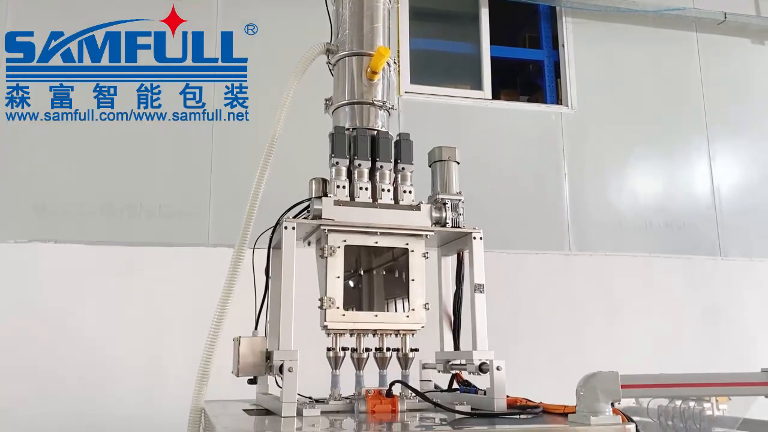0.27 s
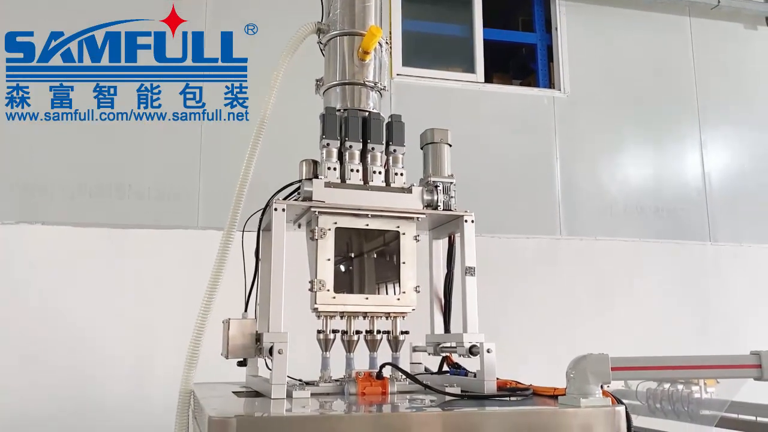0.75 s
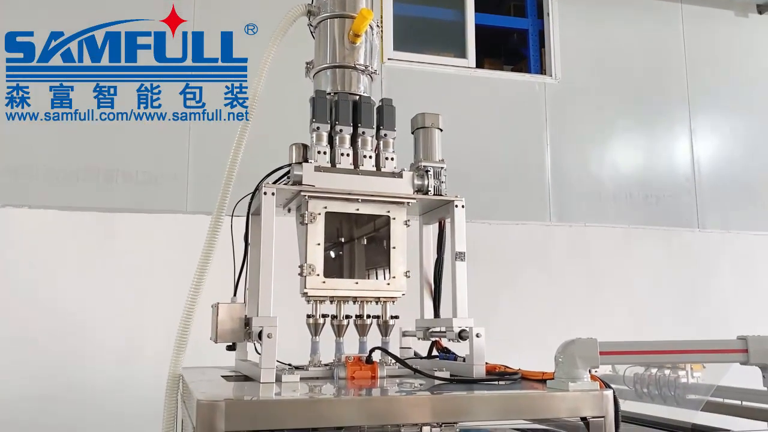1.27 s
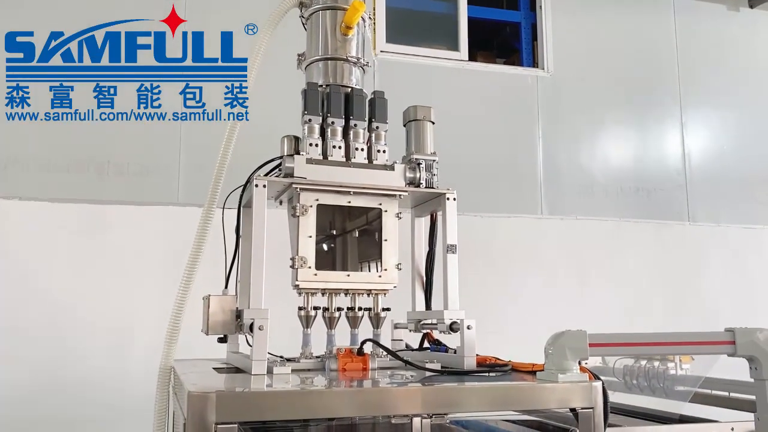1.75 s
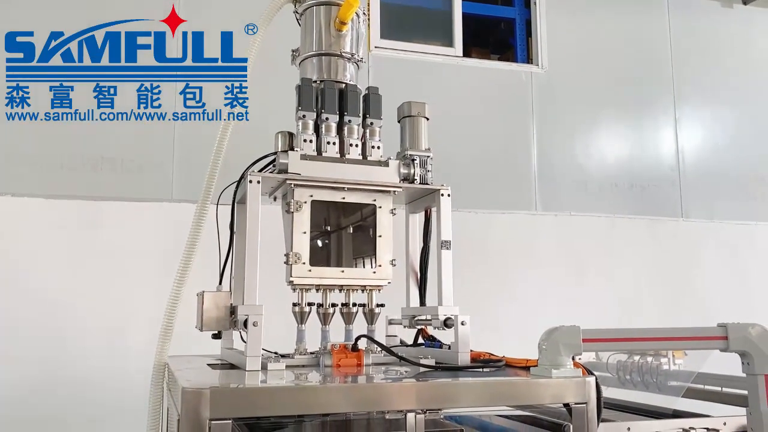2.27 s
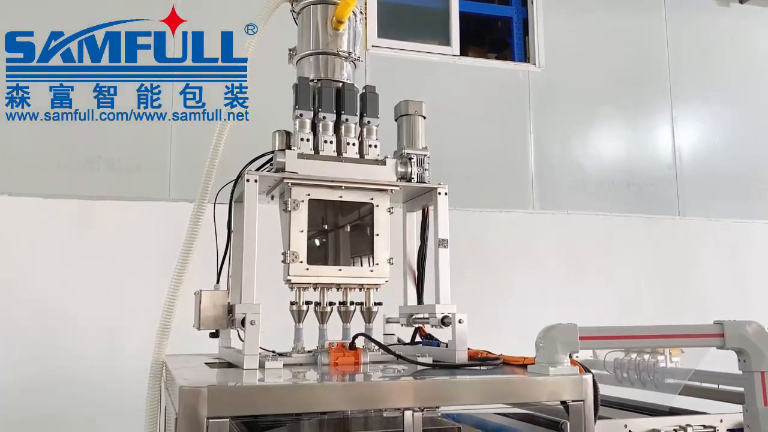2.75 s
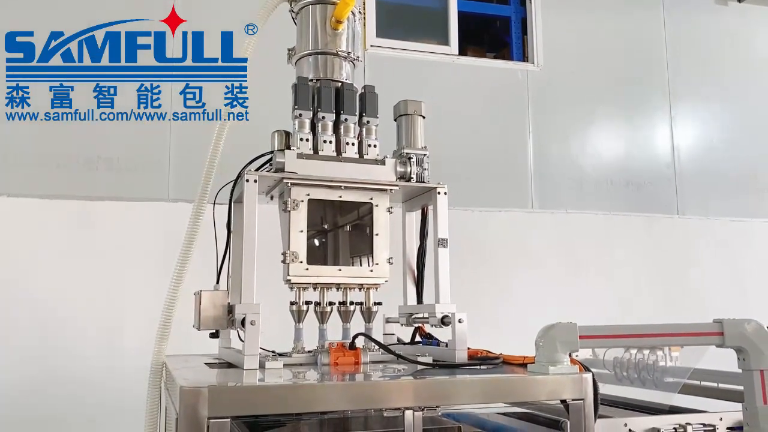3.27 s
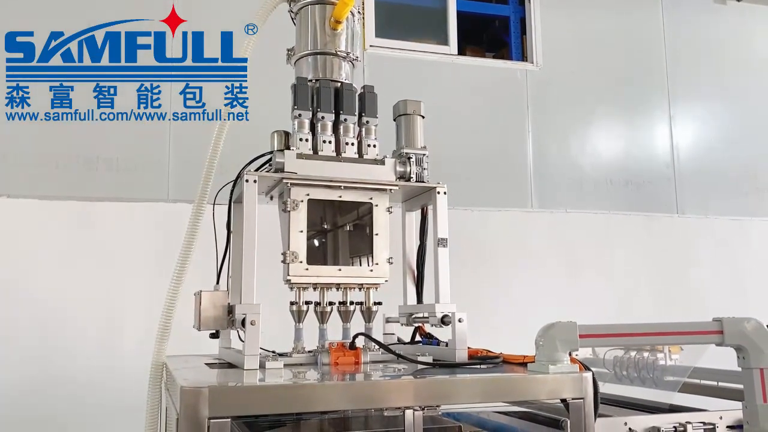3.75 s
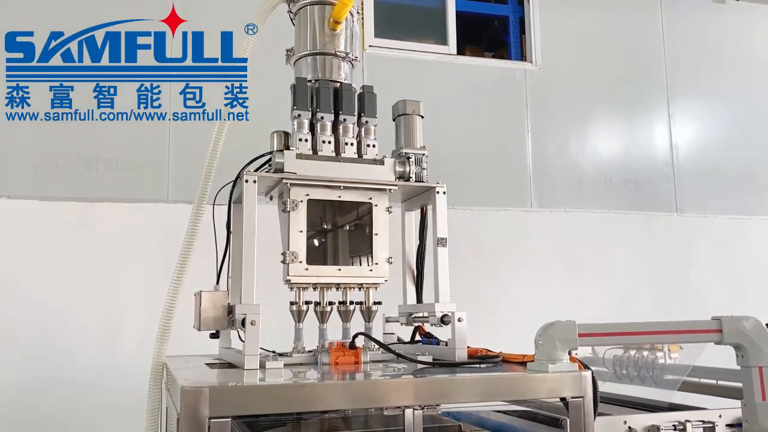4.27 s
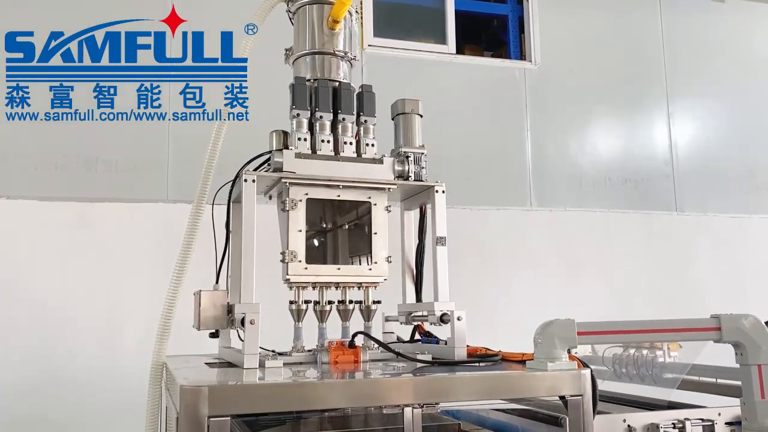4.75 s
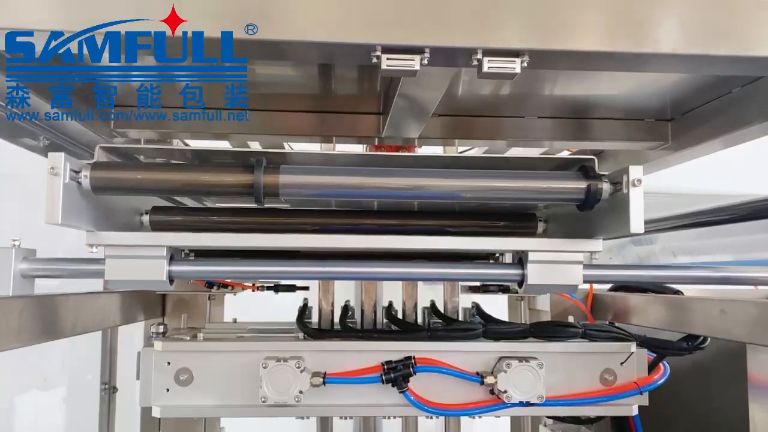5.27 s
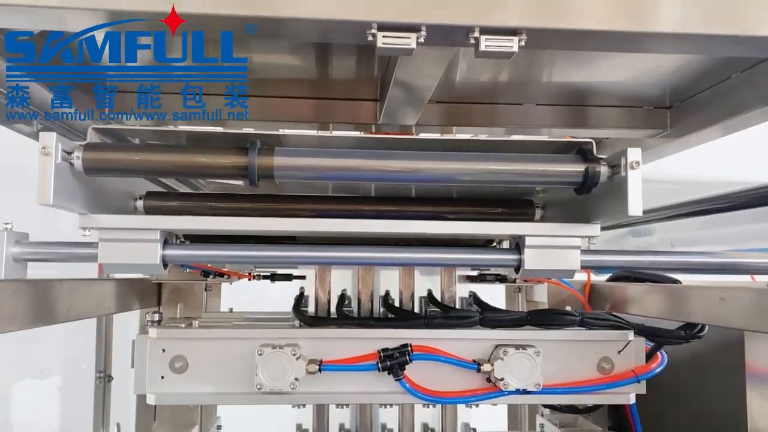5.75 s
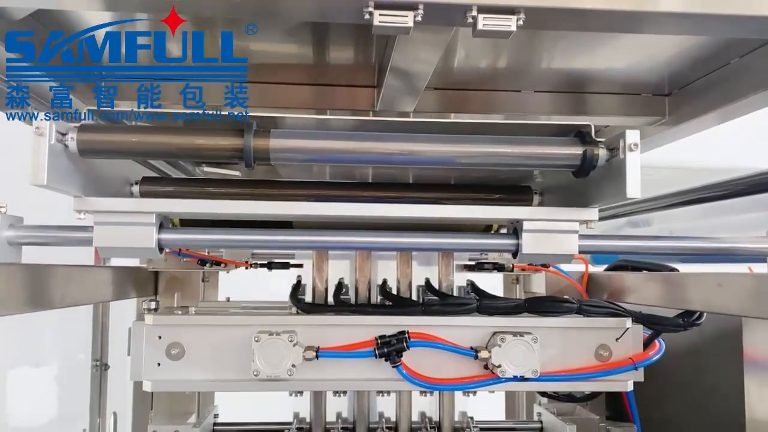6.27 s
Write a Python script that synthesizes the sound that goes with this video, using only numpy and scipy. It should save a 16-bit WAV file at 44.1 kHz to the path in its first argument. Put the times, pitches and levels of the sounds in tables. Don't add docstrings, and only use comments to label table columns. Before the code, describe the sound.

Rattling mechanical strokes swell and slow down over a motor hum, broken by hissing air jets, dull thuds and squeaks, with a tiny dropout before the second view.

```python
import sys
import numpy as np
from scipy import signal
from scipy.fft import rfft, irfft, next_fast_len
from scipy.io import wavfile
from scipy.ndimage import map_coordinates

SR = 44100
rng = np.random.default_rng(int(sys.argv[2]) if len(sys.argv) > 2 else 0)


def unload_audio(sound):
    columns = np.transpose(np.atleast_2d(sound))
    steps = np.round(np.clip(columns, -1, 1) * 32767)
    wavfile.write(sys.argv[1], SR, steps.astype(np.int16))


def ratio(d):
    e = np.asarray(d, float) / 20
    return 10 ** e


N = 287532
T = np.arange(N) / SR

# start t/s, end t/s
GAP = (4.9306, 4.9585)


def unit(x):
    return x / np.sqrt(np.mean(x ** 2) + 1e-20)


def along(points, hz):
    f, v = np.transpose(points)
    return ratio(np.interp(np.log(hz + 1), np.log(f + 1), v))


def curves(rows):
    s, *cols = np.transpose(rows)
    return [np.interp(T, s, c) for c in cols]


def wobble(rate):
    return map_coordinates(rng.standard_normal(int(N * rate / SR) + 4), [T * rate])


def filtered(x, response):
    m = next_fast_len(N + SR // 4)
    return irfft(rfft(x, m) * response(np.fft.rfftfreq(m, 1 / SR)), m)[..., :N]


def ringing(modes):
    def response(f):
        total = 0
        for k, (centre, width, db) in enumerate(modes):
            damping = 1j * f * width
            total = total + (-1) ** k * ratio(db) * damping / (centre * centre - f * f + damping)
        return total
    return response


def noise():
    return rng.standard_normal((2, N))


def rough_tone(hz, drift, flutter_db, rate):
    turn = 2 * np.pi * np.cumsum(hz + 0 * T) / SR
    paths = []
    for _ in range(2):
        level = np.sqrt(2) * ratio(flutter_db * wobble(rate))
        paths.append(level * np.sin(turn + drift * wobble(rate) + rng.uniform(0, 2 * np.pi)))
    return np.array(paths)


def bursts(rows, rise, fall, swell=0):
    power = 0
    for start, end, db in rows:
        attack = np.clip((T - start) / rise, 0, 1)
        level = db + swell * (T - start) - fall * np.maximum(T - end, 0)
        power = power + (attack * ratio(level)) ** 2
    return np.sqrt(power)


def stroke():
    # start t/s, braking t/s, frame level/dB, screw level/dB, shaft tone level/dB
    strokes = [
        (0, 0.457, 0.5, -1.5, -1),
        (3.147, 3.863, 1, -1.5, 0.5),
        (4.94, 4.991, 2, -6, 4.5),
    ]
    rows = np.array(strokes)
    running = np.clip(np.searchsorted(rows[:, 0], T) - 1, 0, None)
    _, braking, *db = rows[running].T
    return T - braking, *db


def shape(since, axis):
    # t/s from braking, speed/turns per s, effort level/dB, shaft tone level/dB
    course = [
        (-.72, 36, -35, -47),
        (-.52, 40.5, -8, -33),
        (-.33, 45.7, -1.5, -31),
        (-0.058, 46.2, 0.5, -24.5),
        (.07, 44.8, -3, -20.5),
        (.3, 37.5, -8.5, -36),
        (.53, 35, -11, -37),
        (.83, 32, -18.5, -46),
        (1.2, 30, -26.5, -67),
    ]
    return np.interp(since, *np.transpose(course)[[0, axis]])


def follow(full_db, run_up, coast, hold_s):
    since = stroke()[0]
    held = np.where(since < 0, since, np.maximum(since - hold_s, 0))
    effort = shape(held, axis=2) - shape(0, axis=2)
    return full_db + np.where(since < 0, run_up, coast) * effort


def hall():
    # f/Hz, density level/dB per Hz
    floor_colour = [(20, -60), (35, -25), (50, -6), (100, 0), (300, -11), (500, -13.5), (700, -20),
                    (1000, -22), (3000, -28.5), (7000, -43.5), (12000, -41.5), (16000, -77)]
    return ratio(-30.5) * unit(filtered(noise(), lambda f: along(floor_colour, f)))


def electrics():
    # t/s, f/Hz, level/dB
    inverter = [(0, 5870, -62), (.7, 5865, -54), (1.0, 5872, -49.5), (1.8, 5860, -50), (2.25, 5902, -47),
                (2.4, 5890, -55), (4.2, 5885, -57), (4.5, 5930, -53), (4.93, 5970, -54)]
    # t/s, fan level/dB, pump level/dB
    motor_load = [(0, -1.5, -4.5), (2.35, 3, -7), (2.45, -1, -2), (3.1, 3, -6.5), (3.3, 6, -21),
                  (4.94, 4.5, -22), (4.96, -1, -18), (5.9, -3, -11.5), (6.05, 0, 3), (6.52, 1, -2.5)]
    # f/Hz, rms level/dB
    fan_hum = [(248, -44.5), (495.5, -44.5), (991, -54)]
    # f/Hz, rms level/dB
    pump_hum = [(118.4, -34), (300.5, -39)]
    hz, db = curves(inverter)
    fan_db, pump_db = curves(motor_load)
    whine = rough_tone(hz, drift=.5, flutter_db=3.5, rate=90)
    whine = whine + ratio(-3.5) * rough_tone(2 * hz, drift=1.1, flutter_db=4.5, rate=93)
    fan = sum(ratio(level) * rough_tone(f, drift=0.81, flutter_db=0.7, rate=14) for f, level in fan_hum)
    pump = sum(ratio(level) * rough_tone(f, drift=0.62, flutter_db=2.0, rate=9) for f, level in pump_hum)
    return ratio(db) * (T < GAP[1]) * whine + ratio(fan_db) * fan + ratio(pump_db) * pump


def frame():
    # f/Hz, density level/dB per Hz
    rumble_colour = [(22, -37), (38, -7.5), (59, -1), (230, 0), (270, -4.5), (304, -2), (323, -5),
                     (420, -15), (550, -65), (920, -120)]
    # f/Hz, width/Hz, level/dB
    steelwork = [(47.6, 5.7, 3), (70, 2.4, 0), (86, 7.6, 2.5), (153.3, 8.5, -6), (225, 14.4, -2),
                 (275, 11.4, -13)]
    # f/Hz, density level/dB per Hz
    clatter_colour = [(230, -6), (330, 1.5), (600, -5), (1000, -9.5), (2000, -16), (2600, -23.5),
                      (3600, -25), (5000, -55)]
    # f/Hz, width/Hz, level/dB
    cover_modes = [(413, 6.4, 3), (579, 29, -2), (718, 33, -0.5), (1088, 96, -1.5), (1514, 11, 1),
                   (1740, 16, 3), (2260, 24, 1.5)]
    # t/s, level/dB
    jolt_hits = [(.04, -21.5), (.33, -24), (.6, -23.5), (.83, -21.5), (1.23, -26), (1.95, -30), (2.3, -34),
                 (3.25, -23), (3.46, -35), (4.16, -19), (4.3, -21.5), (4.66, -24.5), (5.3, -17.5),
                 (5.77, -18.5), (5.901, -29)]
    frame_db = stroke()[1]
    shaken = bursts([(s, s, db) for s, db in jolt_hits], rise=0.0084, fall=55)
    unrest = wobble(14)
    panels = lambda f: along(rumble_colour, f) * (1 + 1.56 * abs(ringing(steelwork)(f)))
    covers = lambda f: along(clatter_colour, f) * (1 + 1.4 * abs(ringing(cover_modes)(f)))
    rumble = unit(filtered(ratio(2.0 * unrest + 0.58 * wobble(40)) * noise(), panels))
    clatter = unit(filtered(ratio(1.9 * unrest + 1.15 * wobble(45)) * noise(), covers))
    rumble_db = frame_db + follow(full_db=-22.5, run_up=.5, coast=0.65, hold_s=0.48)
    clatter_db = frame_db + follow(full_db=-29, run_up=0.4, coast=0.9, hold_s=0.31)
    rumble = np.hypot(ratio(rumble_db), shaken) * rumble
    return rumble + ratio(1.5) * np.hypot(ratio(clatter_db), ratio(-9) * shaken) * clatter


def screw():
    # f/Hz, width/Hz, level/dB
    nut = [(6586, 190, -5), (11965, 102, 1)]
    # f/Hz, density level/dB per Hz
    contact_colour = [(3000, -36), (5500, 5.5), (7500, -3), (9000, 9.5), (10500, -4), (13700, 5.5),
                      (16000, -17)]
    # order of the turning speed, level/dB
    shaft_orders = [(1, -12), (2, -1), (5, -2), (9, -26)]
    # f/Hz, level/dB
    beams = [(70, -3), (140.3, -2), (422, -25)]
    since, _, screw_db, shaft_db = stroke()
    speed = shape(since, axis=1)
    tick_db = follow(full_db=-31.5, run_up=2, coast=1.84, hold_s=0.12) + screw_db
    tone_db = shape(since, axis=3) + shaft_db
    turns = np.cumsum(speed) / SR + 0.28
    size = ratio(2.2 * rng.standard_normal((400, 2)))[turns.astype(int)].T
    away = (turns % 1 - .5) / speed
    away_second = ((turns + 0.38) % 1 - .5) / speed
    contact = size[0] * np.exp(-(away / 0.00134) ** 2)
    contact = contact + 0.11 * size[1] * np.exp(-(away_second / 0.0006) ** 2)
    ticks = unit(filtered(contact * noise(), lambda f: along(contact_colour, f)))
    rolling = 0.48 * ratio(1.1 * wobble(50))
    ring = unit(filtered((contact + rolling) * noise(), ringing(nut)))
    tones = sum(ratio(db) * rough_tone(k * speed, drift=0.2, flutter_db=-1.5, rate=7) for k, db in shaft_orders)
    tones += sum(ratio(db) * rough_tone(hz, drift=0.46, flutter_db=7.5, rate=5) for hz, db in beams)
    return ratio(tick_db) * (ratio(0.5) * ring + ratio(-3) * ticks) + ratio(tone_db - 4.5) * tones


def air():
    # f/Hz, density level/dB per Hz
    low_colour = [(1500, 2.5), (2400, -2.5), (3500, 0.5), (5000, 1), (6500, -1), (7500, -3.5), (9000, -50)]
    # f/Hz, density level/dB per Hz
    high_colour = [(5000, -44), (6500, -8.5), (8000, 4.5), (10500, 3.5), (12500, 0), (14500, 3),
                   (15700, -2), (17000, -25)]
    # open t/s, shut t/s, low hiss level/dB, high hiss level/dB
    valves = [
        (1.926, 2.058, -45.5, -48),
        (2.281, 3.1, -41.5, -45),
        (3.2, 3.264, -42, -52),
        (5.066, 5.123, -40, -50),
        (5.363, 6.6, -44.5, -51.5),
        (5.393, 5.588, -63.5, -53),
        (5.73, 5.9, -46.5, -62),
        (6.438, 6.6, -44, -44.5),
    ]
    screw_db = stroke()[2]

    def jets(axis):
        return bursts(np.array(valves)[:, [0, 1, axis]], rise=0.04, fall=88, swell=1)

    flutter = ratio(.4 * wobble(12) + .7 * wobble(35))
    low = unit(filtered(noise(), lambda f: along(low_colour, f)))
    high = unit(filtered(noise(), lambda f: along(high_colour, f)))
    low_db = follow(full_db=-36.5, run_up=0.3, coast=1.13, hold_s=0.0563) + 0.1 * screw_db
    high_db = follow(full_db=-44, run_up=0.2, coast=1.12, hold_s=0) + 0.24 * screw_db
    low = ratio(5.5) * np.hypot(ratio(low_db), jets(axis=2)) * low
    high = ratio(10.0) * np.hypot(ratio(high_db), jets(axis=3)) * high
    return flutter * (low + high)


def squeaks():
    # t/s, length/s, f/Hz, width/Hz, level/dB
    rubs = [
        (0, 0.094, 14300, 500, -35),
        (2.02, 0.078, 1740, 130, -44),
        (2.915, 0.062, 1240, 27, -38),
        (4.957, 0.44, 1790, 690, -34.5),
        (0.275, .07, 14200, 500, -42),
        (3.293, 0.23, 14250, 500, -36),
        (3.325, 0.027, 9280, 82, -27),
        (4.148, 0.26, 1132, 73, -36.5),
    ]
    out = np.zeros((2, N))
    for s, length, hz, width, db in rubs:
        swell = np.sin(np.pi * np.clip((T - s) / length, 0, 1)) ** 0.34
        out += ratio(db) * swell * unit(filtered(noise(), lambda f: ringing([(hz, width, 0)])(f) ** 2))
    return out


def knocks():
    # t/s, thud level/dB, thud f/Hz, clack level/dB, decay t60/s
    strikes = [(0.037, -37, 110, -19.5, 0.17), (0.081, -14, 70, -48, 0.9), (2.051, -30, 151, -31, 0.22),
               (2.292, -9.5, 135, -42, 0.074), (3.105, -8.5, 130, -30.5, 0.18), (.8, -16.5, 202, -42, .3),
               (4.17, -16.5, 205, -40, 0.23), (3.16, -15.5, 70, -39, 0.44), (3.199, -19.5, 149, -45, 0.33),
               (3.245, -28, 200, -21.5, 0.17), (3.443, -21, 149, -23.5, 0.12), (3.47, -13, 70, -52, 0.54),
               (3.74, -31, 140, -17.5, 0.083), (4.32, -15, 154, -41, 0.078), (5.088, -40, 204, -21.5, 0.31),
               (5.301, -23, 220, -26, 0.37), (5.748, -24, 139, -19, 0.1), (5.79, -23, 77.3, -53, 0.36),
               (6.152, -23.5, 149, -27, 0.15), (6.46, -17, 129.5, -45, 0.23)]
    out, t = np.zeros((2, N + SR)), T[:SR // 3]
    clack = filtered(noise(), lambda f: 1 / (1 + (f / 1900) ** 4) / (1 + (300 / (f + 1)) ** 4))
    for s, thud_db, hz, clack_db, t60 in strikes:
        i = round(s * SR)
        fall = ratio(-60 * t / t60) * (1 - np.exp(-t / 0.005))
        thud = np.sin(2 * np.pi * hz * t) + 0.44 * np.sin(2 * np.pi * 0.606 * hz * t)
        fresh_clack = unit(np.roll(clack, -i, axis=1)[:, :len(t)])
        out[:, i:i + len(t)] += fall * (ratio(thud_db) * thud + ratio(clack_db) * fresh_clack)
    return out[:, :N]


def augers():
    # t/s, tooth rate f/Hz, level/dB, load tilt/dB per order
    dosing = [
        (2.28, 539.3, -60, 2),
        (2.3, 545.6, -24, -4),
        (2.36, 539, -35.5, -1.3),
        (2.6, 540.3, -42, 1.1),
        (2.75, 545.6, -38.5, 0.2),
        (3.1, 539, -45, 2.6),
        (3.17, 540, -54, 2.5),
    ]
    # order, level/dB
    teeth = [(1, 0), (2, -3), (3, -6), (4, -6), (5, -12.5), (6, -11.5), (7, -14), (8, -10.5), (9, -11)]
    hz, db, tilt_db = curves(dosing)
    out = 0
    for k, level in teeth:
        for detune in (.986, .996, 1.005, 1.016):
            rate_hz = k * hz * (detune + .006 * wobble(12))
            tone = rough_tone(rate_hz, drift=.6 + 0.4 * k, flutter_db=5, rate=45)
            out = out + ratio(level + tilt_db * min(k, 4)) * tone
    return ratio(db - 9.0) * (T > dosing[0][0]) * (T < dosing[-1][0]) * out


def ports(paths):
    # f/Hz, likeness, right-port phase/rad, left over right level/dB
    port_pair = [(0, .996, 0, .2), (100, .985, 0, .7), (200, .96, -.1, 1.6), (330, .9, -.15, 3),
                 (500, .68, .2, 2.5), (900, .45, 1, 0), (1700, .4, -.4, .8), (2200, .5, 0, 1),
                 (3000, .5, 1.1, -2.5), (4000, .35, .3, -1), (5300, .3, 1.1, -2), (6300, .62, .2, -2),
                 (7000, .8, -.9, .6), (9000, .95, -3.14, 0), (12350, .95, -6.28, 0), (15200, .95, -9.42, 0),
                 (16000, .95, -9.9, 0)]
    f, *cols = np.transpose(port_pair)

    def response(hz, sign):
        alike, phase, pan_db = [np.interp(hz, f, c) for c in cols]
        u = np.arccos(np.clip(alike, -1, 1)) / 2
        return ratio(sign * pan_db / 2) * np.exp(-.5j * sign * phase) * [np.cos(u), sign * np.sin(u)]

    return np.array([filtered(paths, lambda hz: response(hz, sign)).sum(axis=0) for sign in (1, -1)])


def scene():
    # f/Hz, level/dB
    close_colour = [(30, 3), (90, -8.5), (140, -1.5), (230, 0), (420, -2), (560, 2), (1000, -3),
                    (1900, -3.5), (3000, 0)]
    machine = frame() + screw()
    machine = np.where(T < GAP[0], machine, filtered(machine, lambda f: along(close_colour, f)))
    return ports(machine + air() + electrics() + augers() + knocks() + squeaks() + hall())


def joint_stereo(x):
    window, lead = signal.windows.kaiser_bessel_derived(2048, 4 * np.pi), 773
    mid_side = np.pad([x[0] + x[1], x[0] - x[1]], ((0, 0), (lead, 0)))
    z = signal.stft(mid_side, window=window, nperseg=2048)[2]
    bands = z[:, :1024].reshape(2, 32, 32, -1)
    level = 10 * np.log10(np.mean(abs(bands) ** 2, axis=2) + 1e-20)
    busy = np.clip(level[0, 17] + 46.5 + 2.5 * rng.standard_normal(level.shape[2]), 0, 8)
    margin = 7.3 + 2.5 * busy + .6 * rng.standard_normal(level.shape[1:])
    weak = (level < level[::-1] - margin) & (np.arange(32) >= 9)[:, None]
    z[:, :1024] = (bands * ~weak[:, :, None]).reshape(2, 1024, -1)
    mid, side = signal.istft(z, window=window, nperseg=2048)[1][:, lead:lead + N] / 2
    return np.array([mid + side, mid - side])


def top_cut(x):
    return signal.sosfilt(signal.butter(12, 15730, fs=SR, output="sos"), x)


def record(dry):
    fade_out = (GAP[0] - T) / 0.0025
    fade_in = (T - GAP[1]) / 0.0079
    keep = np.clip(np.maximum(fade_out, fade_in), 0, 1)
    dry = filtered(dry, lambda f: 1 / np.sqrt(1 + (38 / (f + 1)) ** 12))
    return top_cut(joint_stereo(dry) * keep)


dry = scene()
out = record(dry)
unload_audio(out)
```